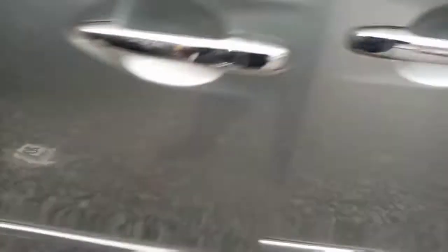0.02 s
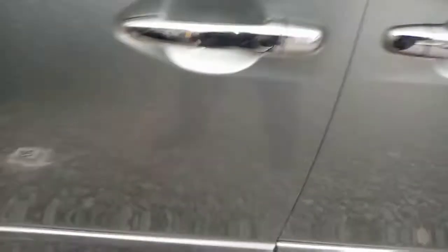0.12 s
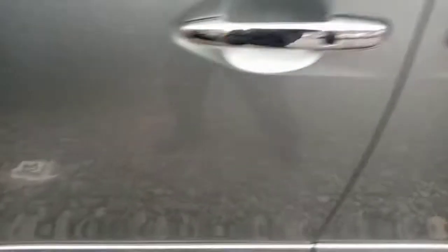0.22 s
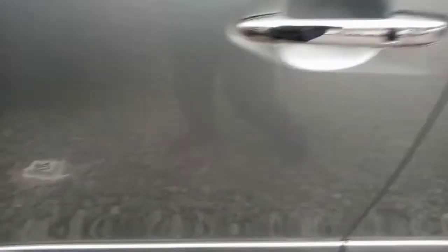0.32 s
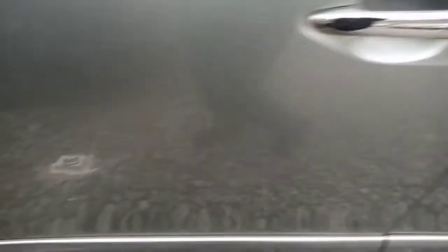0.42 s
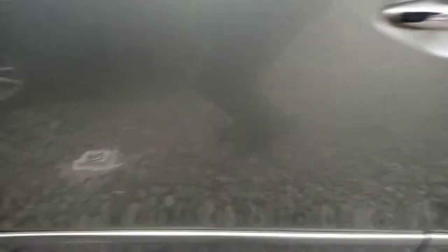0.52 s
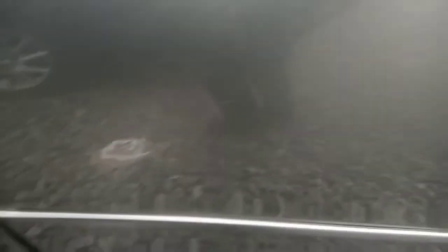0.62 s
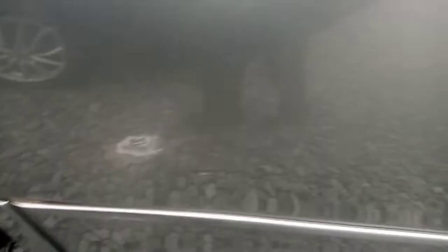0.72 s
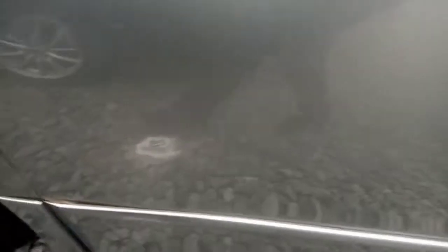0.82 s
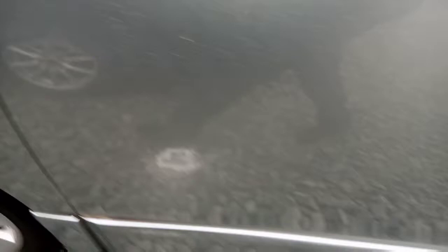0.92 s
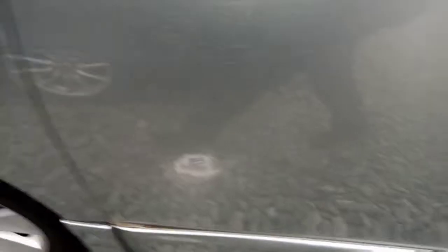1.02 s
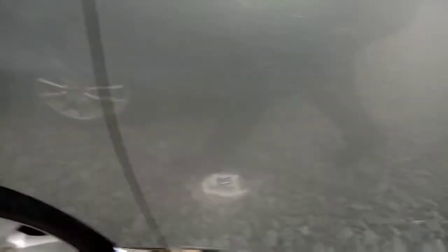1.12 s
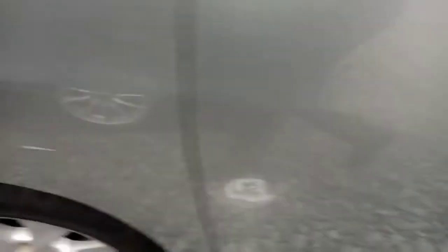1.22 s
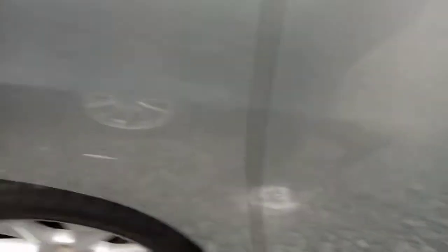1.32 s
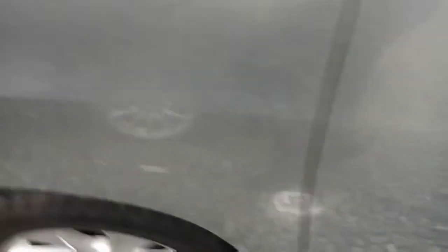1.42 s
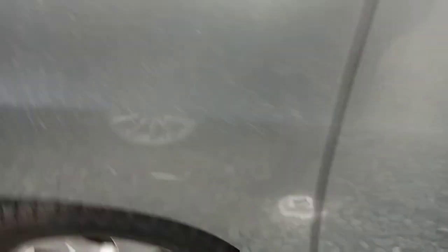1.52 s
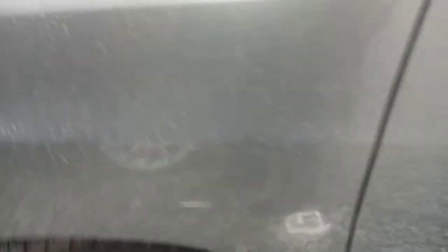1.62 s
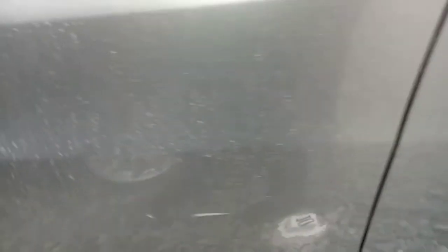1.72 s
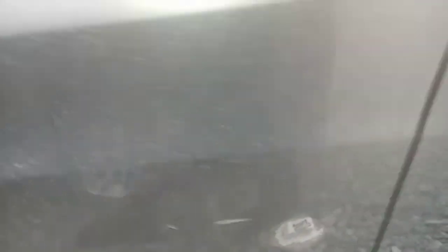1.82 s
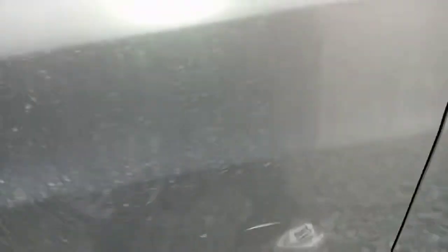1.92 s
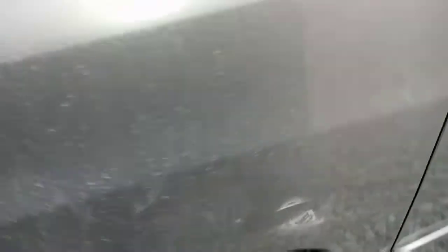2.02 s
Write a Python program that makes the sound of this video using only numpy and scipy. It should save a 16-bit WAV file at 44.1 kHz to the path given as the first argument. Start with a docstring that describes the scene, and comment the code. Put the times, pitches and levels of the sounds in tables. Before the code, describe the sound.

Outdoors among parked cars, faint low buzz and hiss, then one abrupt car door slam: metallic click, shuddering thud, quick decay and soft echo tail. Thin, bass-light, dull-topped microphone sound with slight crackles on the right.

```python
"""A yard of hard walls and parked cars: a car door is slammed a few metres away.
The latch clicks twice (noise bursts in steel modes), the door thuds and shudders (knocks on panel modes).
Cabin air swells (low sines), trim rattles (grains and noise), the yard answers with a long tail (noise echoes).
Below: a steady 50 Hz buzz with many overtones (one repeated period), faint coloured-noise hiss,
and faint ticks on the right (short grit bursts)."""
import sys
import numpy as np
from scipy import signal
from scipy.fft import rfft, irfft
from scipy.io import wavfile

SR = 44100
rng = np.random.default_rng(int(sys.argv[2]) if len(sys.argv) > 2 else 0)


def pcm_store(signal):
    """Save signal as 16-bit PCM."""
    levels = np.round(np.clip(np.atleast_2d(signal), -1, 1) * 32767)
    wavfile.write(sys.argv[1], SR, levels.astype(np.int16).T)


def gain_from_db(level_db):
    """Convert decibel levels to linear amplitude factors (20 dB per decade)."""
    decades = np.asarray(level_db, float) / 20
    return 10 ** decades


N = 92610   # samples


def at_hz(rows, hz, col=1):
    """Read a column of a table on a log-frequency axis."""
    rows = np.array(rows, float)
    return np.interp(np.log(np.maximum(hz, 1)), np.log(rows[:, 0]), rows[:, col])


def rms_one(x):
    """Scale to rms 1."""
    return x / np.sqrt(np.mean(x ** 2) + 1e-20)


def colour(x, spectrum):
    """Weight a steady noise by the spectrum of a table; rms 1."""
    gain = gain_from_db(at_hz(spectrum, np.fft.rfftfreq(N, 1 / SR)))
    return rms_one(irfft(rfft(x) * gain, N))


def struck(events, modes, spread_db, chatter_s=None):
    """Each blow excites every decaying mode with its own strength; a chattering blow is a noise burst."""
    s, db = np.transpose(events)
    strength = rng.standard_normal((len(s), len(modes)))
    out, noise = np.zeros(N), rng.standard_normal(N)
    for k, (hz, mode_db, t60_s) in enumerate(modes):
        drive = np.full(N, 1e-18)
        drive[(s * SR).astype(int)] = -gain_from_db(db + mode_db + spread_db * strength[:, k])
        if chatter_s:
            fade = np.exp(-1 / (chatter_s * SR))
            drive = noise * signal.lfilter([np.sqrt(1 - fade ** 2)], [1, -fade], drive)
        # two-pole resonator
        r = gain_from_db(-60 / (t60_s * SR))
        w = 2 * np.pi * hz / SR
        out += signal.lfilter([0, np.sin(w)], [1, -2 * r * np.cos(w), r * r], drive)
    return out


# Door knocks on seal and frame. Each row: start in seconds, drive level in dB.
KNOCKS = [(.2125, -33.5), (.2195, -30.5), (.2255, -32.5), (.2345, -28.5), (.2365, -25), (.2415, -32),
          (.2448, -28.5), (.2512, -24.5), (.2643, -22.5), (.2775, -25.5), (.2848, -24.5), (.2918, -28.5),
          (.3008, -24.5), (.3110, -26.5), (.3290, -30.5), (.592, -45)]
# Door panel and cabin modes. Each row: frequency in Hz, relative level in dB, t60 in seconds.
DOOR_MODES = [(130, -26, 0.02), (158, -12.5, 0.14), (184.4, -13.5, 0.08), (225, -13.5, 0.095),
              (241.5, -10.5, 0.12), (277, -19, 0.059), (299, -13.5, 0.027), (353.5, -18.5, 0.065),
              (400, -18, 0.052), (449, -21, 0.031), (466, -23, 0.05), (555, -17, 0.035),
              (601, -18.5, 0.039), (645, -20, 0.038), (681, -28.5, 0.056), (730, -38, 0.068),
              (870, -37, 0.045), (1105, -25, 0.042)]
SEAL_SOFT_HZ, PANEL_LOW_HZ = 1220, 113


def door():
    """Knocks ring the panel modes; rubber seals round them off and the panel radiates little bass."""
    knocks = struck(KNOCKS, DOOR_MODES, spread_db=3.0)
    soft = signal.lfilter(*signal.butter(1, SEAL_SOFT_HZ, fs=SR), knocks)
    return signal.sosfilt(signal.butter(2, PANEL_LOW_HZ, "high", fs=SR, output="sos"), soft)


# Cabin air swells as the seals close.
# Each row: frequency in Hz, peak level in dB before the bass cut, peak time in seconds, rise in seconds.
CABIN_SWELLS = [(46.4, -41.5, 0.26, 0.033), (81.1, -45, 0.29, 0.046)]


def cabin():
    """Squeezed cabin air: low sines rise over the shudder and sink again."""
    t = np.arange(N) / SR
    out = np.zeros(N)
    for hz, db, peak_s, rise_s in CABIN_SWELLS:
        u = np.maximum((t - peak_s) / rise_s + 2, 0) / 2   # 1 at the peak
        swell = (u * np.exp(1 - u)) ** 2
        out += gain_from_db(db) * swell * np.sin(2 * np.pi * (hz * t + rng.random()))
    return out


# Latch contacts. Each row: start in seconds, drive level in dB.
LATCH_CONTACTS = [(.2100, -41), (.2110, -34.5), (.2165, -39), (.2358, -35.5), (.2385, -40), (.2560, -50.5)]
# Latch steel modes. Each row: frequency in Hz, relative level in dB, t60 in seconds.
STEEL_MODES = [(1306, -19, 0.0017), (1870, -16, 0.0019), (2720, -8.5, 0.0069), (3090, -0.5, 0.0025),
               (3970, -8.5, 0.0045), (4580, -9, .005), (5400, -12.5, 0.0032), (5740, -14, 0.0025)]
LATCH_CHATTER_S = 0.0028


def latch():
    """Each steel contact chatters for a few milliseconds and rings the latch modes."""
    return struck(LATCH_CONTACTS, STEEL_MODES, spread_db=4.5, chatter_s=LATCH_CHATTER_S)


# Trim and glass rattle over time. Each row: time in seconds, level in dB.
RATTLE_LEVEL = [(0.18, -86), (0.201, -54.5), (0.207, -49), (0.215, -43), (0.239, -43), (0.3, -45),
                (0.341, -52.5), (0.4, -62.5), (0.45, -61)]
# Rattle spectrum. Each row: frequency in Hz, relative level in dB per Hz.
RATTLE_SPECTRUM = [(100, -42), (250, 12.5), (650, 7), (1150, -1), (1780, 0), (2500, -6), (4170, -6),
                   (6040, -11.5), (8000, -21)]
RATTLES_PER_S, RATTLE_NOISE_SHARE = 6600, 0.78
RATTLE_FALL_DB_PER_S = 71   # after the last row


def rattle():
    """Dense small contacts of trim and glass plus escaping air, while the door shudders."""
    hits = rng.random(N) < RATTLES_PER_S / SR
    grains = hits * gain_from_db(0.5 * rng.exponential(1, N)) * rng.choice([-1, 1], N)
    air = rng.standard_normal(N)
    mix = (1 - RATTLE_NOISE_SHARE) * rms_one(grains) + RATTLE_NOISE_SHARE * air
    s, db = np.transpose(RATTLE_LEVEL)
    t = np.arange(N) / SR
    level_db = np.interp(t, s, db) - RATTLE_FALL_DB_PER_S * np.maximum(t - s[-1], 0)
    return colour(mix, RATTLE_SPECTRUM) * gain_from_db(level_db) * (t > s[0])


# Yard reverberation. Each row: frequency in Hz, near walls level in dB, near t60 in seconds,
# far walls level in dB, far t60 in seconds.
YARD_DECAYS = [(61, -8, 0.38, -7.5, 1.2), (151, -6.5, 0.69, -12.5, 2.4), (228, -8, 0.22, -13.5, 2.4),
               (320, 0, 0.52, -10, 3.2), (816.5, -7, 0.49, -6, 1.66), (1900, 3, 0.41, -5.5, 5.6),
               (6080, -6.5, 0.13, -9.5, 5.1)]
YARD_BUILD_S, NEAR_SIDE_DB, FAR_SIDE_DB = 0.011, -24, -20.5   # side re mid


def yard(x):
    """Diffuse echoes in half-octave bands: a quick decay from near walls, a slow one from far walls."""
    t = np.arange(N) / SR
    edges_hz = 30 * 2 ** np.arange(0, 8.6, .5)
    white = rng.standard_normal((2, 2, N))   # sets alternate between bands
    reply = np.zeros((2, N))
    for k, (low, high) in enumerate(zip(edges_hz, edges_hz[1:])):
        band = signal.sosfilt(signal.butter(2, [low, high], "band", fs=SR, output="sos"), white[k % 2])
        centre_hz = np.sqrt(low * high)
        near_db, near_s, far_db, far_s = (at_hz(YARD_DECAYS, centre_hz, col=c) for c in range(1, 5))
        near = gain_from_db(near_db - 60 * t / near_s) / np.sqrt(near_s * SR / 14)
        far = gain_from_db(far_db - 60 * t / far_s) / np.sqrt(far_s * SR / 14)
        mid_power = near ** 2 + far ** 2
        side_power = (near * gain_from_db(NEAR_SIDE_DB)) ** 2 + (far * gain_from_db(FAR_SIDE_DB)) ** 2
        reply += band * np.sqrt([mid_power, side_power])
    reply *= 1 - np.exp(-t / YARD_BUILD_S)
    mid, side = signal.fftconvolve(reply, x[None], axes=1)[:, :N]
    return np.array([mid + side, mid - side])


# Buzz overtones 1, 2, 3 .. of BUZZ_HZ. Each entry: rms in dB before the treble cut.
BUZZ_OVERTONES = [-90, -82, -72, -85, -75, -75, -78, -80, -72, -72, -82, -79, -85, -71, -82, -78, -94, -85,
                  -91, -77, -82, -91, -80, -78, -81, -87, -86, -79, -93, -81, -83, -84, -87, -95, -89, -83,
                  -86, -80, -90, -87, -82, -87, -85, -86, -86, -85, -92, -87, -85, -85, -87, -95, -94, -85,
                  -95, -100, -100, -94, -97, -82, -89, -88, -97, -86, -88, -86, -86, -87, -88, -92, -97,
                  -87, -82, -84, -88, -91, -97, -91, -89, -89, -92, -95, -82, -90, -99, -100, -97, -84, -87,
                  -90, -96, -93, -86, -96, -95, -85, -87, -84, -94, -91, -86, -97, -93, -92, -93, -94, -98,
                  -98, -94, -92, -92, -93, -91, -87, -98, -94, -99, -87, -100, -100]
BUZZ_HZ = 50
# 75 uneven overtones beyond the list
BUZZ_TOP_DB, BUZZ_RISE_DB_PER_KHZ, BUZZ_SPREAD_DB = -93.5, 1, 2.4


def buzz():
    """Electrical buzz: one 20 ms period of overtones with chance phases, repeated unchanged."""
    extra = np.arange(1, 76)
    upper_db = BUZZ_TOP_DB + BUZZ_RISE_DB_PER_KHZ * extra * BUZZ_HZ / 1000
    upper_db = upper_db + BUZZ_SPREAD_DB * rng.standard_normal(len(extra))
    db = np.concatenate([BUZZ_OVERTONES, upper_db])
    period = SR // BUZZ_HZ
    cycles = np.outer(np.arange(1, len(db) + 1), np.arange(period)) / period
    phase = 2 * np.pi * (cycles + rng.random((len(db), 1)))
    return np.resize(np.sqrt(2) * gain_from_db(db) @ np.sin(phase), N)


# Lone faint ticks. Each row: start in seconds, level in dB.
LONE_TICKS = [(0.37, -52), (0.412, -56), (0.445, -59), (0.535, -57)]
# Runs of ticks in step with the buzz. Each row: middle in seconds, half length in seconds.
BUZZ_TICK_RUNS = [(.1, 0.049), (0.807, .02), (1.075, 0.055), (1.296, 0.023), (1.394, 0.022), (1.547, 0.068),
                  (1.756, .05), (1.967, 0.043)]
RUN_DB, RUN_SPREAD_DB = -61, 2.5
TICK_BAND_HZ, TICK_DECAY_S, TICK_LEFT_DB = (400, 4000), 0.0045, -36   # left re right


def ticks():
    """Faint short crackles: decaying bursts of band noise, mostly in the right channel."""
    beats_s = np.arange(N * BUZZ_HZ // SR) / BUZZ_HZ
    inside = sum(np.exp(-((beats_s - s) / half) ** 4) for s, half in BUZZ_TICK_RUNS)
    clicks = np.zeros(N)
    run_level = gain_from_db(RUN_DB + RUN_SPREAD_DB * rng.standard_normal(len(beats_s)))
    clicks[(beats_s * SR).astype(int)] = inside * run_level
    s, db = np.transpose(LONE_TICKS)
    clicks[(s * SR).astype(int)] = gain_from_db(db)
    envelope = signal.lfilter([1], [1, -np.exp(-1 / (TICK_DECAY_S * SR))], clicks)
    band = signal.butter(1, TICK_BAND_HZ, "band", fs=SR, output="sos")
    grit = rms_one(signal.sosfilt(band, rng.standard_normal(N)))
    return envelope * grit * gain_from_db(np.array([[TICK_LEFT_DB], [0]]))


# Hiss spectrum. Each row: frequency in Hz, relative level in dB per Hz.
HISS_SPECTRUM = [(24, -41), (40, -18), (110, -2.5), (200, 7), (350, 0), (640, -5.5), (950, -4.5),
                 (2700, -8.5), (5770, -12.5), (7340, -24), (9540, -10.5)]
HISS_DB, HISS_SIDE_DB = -60.5, -14   # mid rms before the recorder's cuts, side re mid


def hiss():
    """Faint steady air and electronics noise, nearly alike on both sides."""
    mid = colour(rng.standard_normal(N), HISS_SPECTRUM)
    side = colour(rng.standard_normal(N), HISS_SPECTRUM)
    return gain_from_db(HISS_DB) * (mid + gain_from_db(HISS_SIDE_DB) * side * [[1], [-1]])


STEEL_PAN_DB = -1.3   # latch and trim, left re right


def scene():
    """Door in the middle, yard around it, ticks and hiss below."""
    steel = latch() + rattle()
    body = door() + cabin()
    panned = steel * gain_from_db(STEEL_PAN_DB * np.array([[.5], [-.5]]))
    return panned + body + yard(steel + body) + ticks() + hiss()


def low_pass(x):
    """Removes everything above the highest recorded frequency."""
    return signal.sosfilt(signal.butter(12, 9700, fs=SR, output="sos"), x)


def record(dry):
    """A narrow-band recorder: bass cut, own buzz, steep treble cut, small steady offset."""
    bass_cut_hz, treble_cut_hz, offset = 137.5, 6450, .0013
    thin = signal.sosfilt(signal.butter(2, bass_cut_hz, "high", fs=SR, output="sos"), dry)
    dull = signal.sosfilt(signal.butter(8, treble_cut_hz, fs=SR, output="sos"), thin + buzz())
    return low_pass(dull + offset)


dry = scene()
out = record(dry)
pcm_store(out)
```